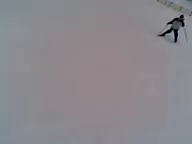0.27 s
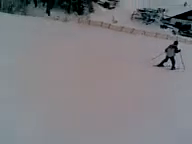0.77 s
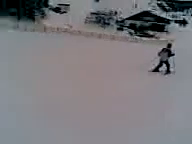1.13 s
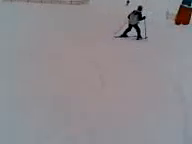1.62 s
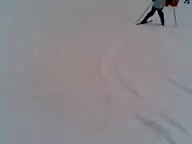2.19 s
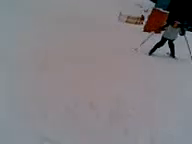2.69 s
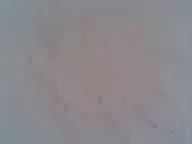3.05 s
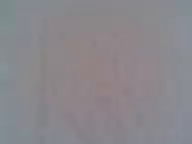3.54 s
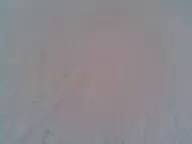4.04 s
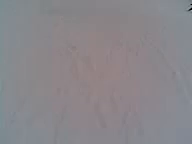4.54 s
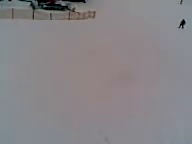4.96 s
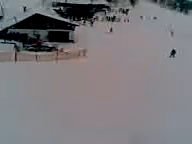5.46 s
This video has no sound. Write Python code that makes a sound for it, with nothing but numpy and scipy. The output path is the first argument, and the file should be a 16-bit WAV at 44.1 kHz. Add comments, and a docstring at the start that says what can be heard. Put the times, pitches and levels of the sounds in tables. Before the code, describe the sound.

On a ski slope, a brief hush breaks into loud, uneven wind buffeting with rough scraping, sharp knocks and clipped crackles.

```python
"""Two faint scuffs in a quiet moment, then wind buffeting a small camera microphone on a ski slope.
Turbulent eddies rumble and slap on the membrane: noise with a falling spectrum, and short ringing puffs.
Skis and cloth scrape and knock: friction noise through the casing's resonances, and damped bursts.
The cheap recorder limits peaks and passes a narrow band with hiss; the sharpest crests clip."""
import sys
import numpy as np
from scipy import signal
from scipy.io import wavfile
from scipy.ndimage import uniform_filter1d, minimum_filter1d

SR = 44100
rng = np.random.default_rng(int(sys.argv[2]) if len(sys.argv) > 2 else 0)


def generate_wav(sig):
    """Save sig (samples, or channels by samples) to the path in sys.argv[1] as 16-bit PCM at SR."""
    pcm = np.round(np.clip(np.atleast_2d(sig).T, -1, 1) * 32767).astype(np.int16)
    wavfile.write(sys.argv[1], SR, pcm)


N = 252252

# Wind strength; faster air reaches higher: t/s, level/dB, spectral fall over the first kHz/dB
WIND_CURVE = [(0, -51, 9), (.52, -53, -1), (.6, -33, 14), (.74, -14.5, 35), (.83, -30.5, 15),
              (.95, -42, 30), (1.0, -28.5, 12), (1.15, -23.5, 48), (1.34, -31, 54), (1.5, -28.5, 11.5),
              (1.62, -22, 7), (1.69, -31.5, 31), (1.8, -25, 32.5), (1.84, -18.5, 37), (2.15, -14.5, 28),
              (2.24, -11, 29.5), (2.31, -21, 29), (2.42, -20, 30.5), (2.5, -15.5, 39), (2.62, -20.5, 8.5),
              (2.79, -23, 31.5), (3.03, -31.5, 37.5), (3.08, -40.5, 30.5), (3.2, -25.5, 31),
              (3.47, -30.5, 49), (3.62, -36, 41), (3.77, -31, 50), (3.84, -21, 21.5), (4.18, -17.5, 31.5),
              (4.25, -21, 27.5), (4.33, -15.5, 36.5), (4.4, -22, 28), (4.45, -14, 20.5),
              (4.48, -17.5, 27.5), (4.54, -15.5, 18), (4.575, -22, 22), (4.6, -10.5, 26.5),
              (4.69, -15, 14.5), (4.74, -23, 37), (4.79, -11, 21), (4.86, -20, 22.5), (4.94, -16.5, 19),
              (5.08, -21, 21), (5.28, -16, 17), (5.5, -19, 25.5), (5.57, -23.5, 23.5), (5.72, -18, 21)]
# Buffeting spectrum before the fall is applied: f/Hz, density level/dB
BUFFET_SPECTRUM = [(20, -44), (50, -34.5), (100, -4.5), (170, -1), (260, 1.5), (400, -0.5)]
# Extra bass from large eddies, before its dependence on wind: t/s, level/dB
EDDY_BASS = [(0, 4.5), (.5, -7.5), (.75, -9.5), (1.2, -2), (1.55, -2.5), (1.9, 1.5), (2.25, -5),
             (2.5, -1.5), (2.7, -6.5), (3.1, -2), (3.7, -1.5), (4.1, -3), (4.5, -0.5), (4.7, -12.5),
             (4.85, -6.5), (5.0, -2), (5.72, -4.5)]
# Single eddies slapping the membrane: t/s, peak level/dB, centre f/Hz
EDDY_SLAPS = [(.59, -7.5, 377), (.677, -8, 885), (.871, -19.5, 332), (1.106, -29, 305), (1.359, -19.5, 190),
              (1.822, -12.5, 235), (1.908, -13, 172), (2.165, -29, 397), (2.279, -3.5, 471),
              (2.745, -23.5, 250), (3.173, -21, 191), (3.308, -27, 295), (3.682, -18, 219),
              (3.791, -15, 201), (3.827, -11, 260), (4.178, -5, 504), (4.289, -8, 295), (4.363, -12.5, 418),
              (4.389, -8, 270), (4.417, -6.5, 430), (4.489, -7.5, 341), (4.543, -8, 470), (4.598, 0.5, 430),
              (4.645, -5, 680), (4.762, -14, 425), (4.9, -23, 520), (4.982, -11.5, 330),
              (5.045, -11.5, 590), (5.103, -11, 534), (5.371, -18.5, 633), (5.402, -9.5, 467),
              (5.515, -19, 430), (5.638, -13.5, 153)]
# Scraping of skis and cloth: t/s, level/dB, gain of the casing's body/dB
SCRAPE_CURVE = [(0, -65.5, 11), (.06, -48.5, -1), (.16, -46.5, 1.5), (.51, -57, 4.5), (.555, -28.5, 6),
                (.61, -18.5, 7), (.65, -22.5, 0), (.77, -20, 11), (.81, -28.5, 0.5), (.95, -39.5, 6.5),
                (1.025, -31, -1), (1.05, -22, 10), (1.1, -34, -5), (1.3, -39, -0.5), (1.38, -42.5, 4),
                (1.48, -26.5, -4.5), (1.6, -27.5, -1), (1.695, -33, 8), (1.712, -29, 6.5), (1.8, -28.5, 3),
                (1.92, -31.5, -2.5), (2.01, -25, 6.5), (2.1, -25.5, 3.5), (2.17, -28, 0),
                (2.47, -36.5, 4.5), (2.59, -17, 2.5), (2.67, -19.5, 0.5), (2.71, -24.5, 8), (2.75, -36, 1),
                (3.04, -37, 0), (3.15, -36, 0.5), (3.45, -37.5, 1.5), (3.5, -34.5, -8.5),
                (3.79, -31.5, -1.5), (4.1, -33.5, -14), (4.3, -36.5, -17), (4.37, -48, -9.5),
                (4.58, -57, -1), (4.6, -30, -11.5), (4.68, -44.5, 2), (4.73, -55.5, -7), (4.85, -53.5, 2),
                (4.98, -37, -5), (5.06, -57, 13), (5.15, -26.5, 2.5), (5.33, -34.5, -6), (5.57, -43, 4),
                (5.72, -41.5, -1)]
# Resonances of the casing: f/Hz, density level/dB
CASING_SPECTRUM = [(30, -60), (150, -17), (350, -22), (700, -5.5), (1250, 1.5), (1500, -4.5), (2000, -2.5),
                   (2500, -3.5), (2800, -10), (3100, -9), (3620, -1.5), (3900, -15.5), (4300, -23),
                   (4500, -33)]
# Gain of the top resonance, before its dependence on scraping: t/s, level/dB
TOP_GAIN = [(0, -7.5), (.5, -6.5), (.9, -2), (1.1, -4), (1.3, 2.5), (1.6, -3), (2.2, -2.5), (2.45, -5.5),
            (2.65, -2), (2.8, -2.5), (3.4, -7.5), (3.7, -1.5), (4.15, 0.5), (4.3, -6.5), (4.4, -2.5),
            (4.55, -9.5), (4.8, -7.5), (4.89, -4), (5.0, -12.5), (5.15, -2), (5.72, -6.5)]
# Short scuffs and knocks: t/s, peak level/dB, centre f/Hz, T60/s,
# breadth (ratio either side of the centre; a floor applies)
SCUFF_EVENTS = [(.057, -23.5, 2320, 0.059, 1.15), (.06, -32, 713, .29, 1.19),
                (.069, -22.5, 2400, .15, 1.11), (.1, -28, 2420, 0.21, 1.08), (.216, -21.5, 870, 0.11, 1.64),
                (.22, -25.5, 713, 0.22, 1.16), (.547, -11.5, 1550, 0.27, 1.2),
                (.716, -14, 1230, 0.055, 1.9), (.779, -14, 1100, 0.093, 1.8), (.872, -11.5, 1260, .03, 2),
                (.904, -14.5, 1530, 0.018, 1.8), (1.037, -3, 1310, .05, 2.2),
                (1.055, -10.5, 1170, 0.059, 2), (1.609, -8.5, 1500, 0.1, 1.7), (1.705, -5, 760, 0.074, 1.6),
                (1.705, -9, 2140, 0.036, 1.2), (1.887, -11.5, 1500, 0.05, 1.66),
                (1.957, -15.5, 1216, 0.11, 0.98), (2.434, -9.5, 900, .035, 2.4),
                (2.54, -6, 1126, 0.11, 1.37), (2.706, -7, 733, 0.035, 1.09),
                (2.959, -16.5, 2560, 0.06, 1.09), (3.316, -28, 2650, .07, 1.07),
                (3.651, -16.5, 1080, 0.074, 1.17), (3.861, -14.5, 3030, 0.045, 1.26),
                (4.332, -16.5, 886, 0.023, 1.9), (4.446, -11, 804, 0.11, 1.32),
                (4.595, -23, 626, 0.063, 1.35), (4.595, -21.5, 3500, 0.085, 1.08),
                (4.867, -16, 940, 0.027, 1.4), (5.102, -25, 697, 0.022, 2), (5.335, -10, 800, 0.024, 1.83)]
# Sharp crests that escape the limiter: t/s, peak level/dB, width/s (a floor applies)
SURGE_EVENTS = [(.684, -2.5, 0.0003), (0.699, -0.5, 0.00032), (0.74, -1.5, 0.00018), (0.745, -2, 0.000087),
                (.768, -2.5, 0.00036), (1.044, -4, 0.00027), (1.057, 0.8, 0.00017), (2.017, -2, 0.0003),
                (2.025, 1, 0.00024), (2.089, -1, 0.00024), (2.098, -2, 0.00013), (2.183, -1.5, 0.00047),
                (2.239, -3, 0.00031), (2.614, -2, 0.0002), (2.635, -2.5, 0.00021), (2.647, -2.5, 0.00018),
                (2.713, -2, 0.00013), (4.198, -0.5, 0.00049), (4.511, -2, 0.00036), (4.539, -1.5, 0.00057),
                (4.598, -2.5, 0.00052), (4.653, -1.5, 0.00046), (4.684, -2.5, 0.00031)]

FALL_HZ = 300  # the buffeting spectrum falls above this
SPLIT_HZ = 390  # above it the wind comes in sharper spits
BASS_PER_FALL, USUAL_FALL_DB = .2, 25  # dB/dB, dB: slow air has larger eddies and more bass
BASS_PER_DB, GUST_DB = -0.34, -26.5  # dB/dB, dB: more bass in lulls, less in gusts above GUST_DB
SLAP_T60_S, SLAP_BREADTH = 0.081, 1.67  # breadth is a ratio either side of the centre
TOP_PER_DB, FIRM_DB = -0.27, -32.5  # dB/dB, dB: less top as scraping grows past FIRM_DB
LIMIT, LIMITER_S = .64, .004  # crest amplitude held by the limiter, time over which its gain moves
BASS_CUT_HZ, BAND_HZ, EDGE_HZ = 45, 4441, 15800  # high-pass, narrow band limit, final low-pass
FULL_SCALE = 0.704  # amplitude at which the recorder clips
HISS_DB, HISS_S = -43, .01  # hiss relative to the sound, time over which it follows the sound


def wind():
    """Turbulence: large eddies give a lumpy rumble, small ones sharper spits on top."""
    t, hz = grid(size=1024)
    level_db, fall_db = follow(WIND_CURVE, t)
    bass_db = follow(EDDY_BASS, t)[0]
    bass_db += BASS_PER_DB * np.maximum(level_db - GUST_DB, -10)
    bass_db += BASS_PER_FALL * (fall_db - USUAL_FALL_DB)

    khz_above = np.maximum(hz - FALL_HZ, 0) / 1000
    shape_db = read(BUFFET_SPECTRUM, hz) - np.maximum(fall_db, 12) * khz_above ** 1.19
    shape_db += bass_db * ramp(hz, 290, 98)
    air = noise(in_band(shape_db, hz, 80, 450), patch_db=1.5, bins=6, frames=3)

    split = signal.butter(2, SPLIT_HZ, fs=SR, output="sos")
    rumble = signal.sosfiltfilt(split, air)
    spits = flutter(32, 2.3) * flutter(120, 2.8) * (air - rumble)
    lumpy = flutter(53, 0.45) * rumble + spits
    strength = gain_of(follow(WIND_CURVE, np.arange(N) / SR)[0])
    return strength * flutter(14, 0.45) * lumpy


def slaps():
    """Impulsive pressure: each eddy strikes the membrane as a short band of decaying noise."""
    events = [(*row, SLAP_T60_S, SLAP_BREADTH) for row in EDDY_SLAPS]
    return bursts(events, rise_s=0.00065, blow=7.8)


def surged(x):
    """Overload: at a few instants a sharp crest escapes the limiter and swamps other motion."""
    lead_s = .003  # time from the start of each window to its crest
    t = np.arange(2 * round(lead_s * SR)) / SR - lead_s
    push, swamped = np.zeros(N), np.zeros(N)
    ways = rng.choice([-1., 1.], len(SURGE_EVENTS))
    for (s, db, width), way in zip(SURGE_EVENTS, ways):
        u = (t / max(width, .00015)) ** 2
        crest = (1 - u) * np.exp(-u / 2)
        add(push, s - lead_s, way * gain_of(db) * crest)
        add(swamped, s - lead_s, np.exp(-(u / 12) ** 2))
    return x * (1 - np.minimum(swamped, 1)) + push


def scrape():
    """Friction: dense noise in quick uneven grains, coloured by the casing's resonances."""
    t, hz = grid(size=512)
    level_db, body_db = follow(SCRAPE_CURVE, t)
    top_db = follow(TOP_GAIN, t)[0] + TOP_PER_DB * np.maximum(level_db - FIRM_DB, -18)
    shape_db = read(CASING_SPECTRUM, hz)
    shape_db = shape_db + body_db * ramp(hz, 1400, 1100) + top_db * ramp(hz, 2420, 3000)
    rush = noise(in_band(shape_db, hz, 1600, 2800), patch_db=2.3, bins=6, frames=8)
    strength = gain_of(follow(SCRAPE_CURVE, np.arange(N) / SR)[0])
    return strength * flutter(27, 1.87) * flutter(220, 1.7) * rush


def scuffs():
    """Contact excitation: brief rubs and knocks start abruptly and die away exponentially."""
    return bursts(SCUFF_EVENTS, rise_s=0.000063, blow=9.6)


def hiss(x):
    """Quantisation: coarse sampling steps give white noise that follows the signal's level."""
    loudness = np.sqrt(abs(uniform_filter1d(x ** 2, round(HISS_S * SR))))
    return gain_of(HISS_DB) * loudness * rng.standard_normal(N)


def bursts(events, rise_s, blow):
    """Damped excitation: each event is a fast-rising puff of noise, band-passed round its centre."""
    out, t = np.zeros(N), np.arange(8000) / SR
    puffs = rng.standard_normal((len(events), len(t)))
    for (s, db, hz, t60, breadth), puff in zip(events, puffs):
        breadth = max(breadth, 1.06)
        edges = [hz / breadth, min(hz * breadth, 4400)]
        decay = gain_of(-60 * t / max(t60, .01))
        puff = puff * (1 - np.exp(-t / rise_s)) * decay
        puff[0] = blow * np.sign(puff[1])  # the first contact is one sharp blow
        band = signal.butter(4, edges, "band", fs=SR, output="sos")
        sound = signal.sosfilt(band, puff)
        add(out, s, gain_of(db) * sound / abs(sound).max())
    return out


def noise(field_db, patch_db, bins, frames):
    """Spectral synthesis: random spectra at given levels, broken into patches of uneven strength."""
    real, imag, patches = rng.standard_normal((field_db.shape[1], len(field_db), 3)).T
    patches = uniform_filter1d(patches, bins, 0)
    patches = evened(uniform_filter1d(patches, frames, 1))
    mean_gain = gain_of(patch_db ** 2 * np.log(10) / 20)  # rms gain of the patches
    spectra = (real + 1j * imag) * gain_of(field_db + patch_db * patches) / mean_gain
    size = 2 * len(real) - 2
    return signal.istft(spectra, nperseg=size, noverlap=3 * size // 4)[1][:N]


def flutter(per_s, depth_db):
    """Amplitude modulation: random quick level changes that keep the mean power."""
    lumps = uniform_filter1d(rng.standard_normal(N), round(SR / per_s))
    lumps = uniform_filter1d(lumps, round(SR / per_s / 2))
    return evened(gain_of(depth_db * evened(lumps)))


def in_band(shape_db, hz, lo, hi):
    """Power normalisation: shifts spectra so that lo-hi has unit power once the frames overlap."""
    power = (gain_of(shape_db) ** 2 * ((hz > lo) & (hz < hi))).sum(0)
    return shape_db - 10 * np.log10(power / 1.5)


def grid(size):
    """Short-time analysis: frame times/s and bin frequencies/Hz, with frames a quarter size apart."""
    return np.arange(4 * N // size + 5) * size / 4 / SR, np.fft.rfftfreq(size, 1 / SR)[:, None]


def read(points, hz):
    """Logarithmic pitch scale: a spectrum's level/dB, interpolated over log frequency."""
    f, value = np.transpose(points)
    return np.interp(np.log(hz + 1), np.log(f + 1), value)


def follow(curve, t):
    """Linear interpolation: the columns of a curve at the times t/s."""
    s, *columns = np.transpose(curve)
    return [np.interp(t, s, c) for c in columns]


def ramp(hz, from_hz, to_hz):
    """Linear weighting: 0 at from_hz, 1 at to_hz and beyond."""
    return np.clip((hz - from_hz) / (to_hz - from_hz), 0, 1)


def gain_of(db):
    """Decibel law: the amplitude ratio of a level."""
    return 10 ** (np.asarray(db) / 20)


def evened(x):
    """Power normalisation: scales x to an rms of one."""
    return x / np.sqrt(np.mean(x ** 2) + 1e-20)


def add(mix, s, sound):
    """Superposition: sums a sound into the mix from time s/s."""
    part = mix[round(s * SR):][:len(sound)]
    part += sound[:len(part)]


def lowpass(x, hz, size):
    """Band limitation: a linear-phase filter, without delay, removes what lies above hz."""
    taps = signal.firwin(size, hz, window=("kaiser", 11), fs=SR)
    return signal.oaconvolve(x, taps[None], "same")


def limited(x):
    """Peak limiting: the gain dips smoothly round every crest above the limit."""
    size = round(LIMITER_S * SR)
    gain = minimum_filter1d(LIMIT / np.maximum(abs(x), LIMIT), size)
    gain = uniform_filter1d(gain, size // 2)
    return x * uniform_filter1d(gain, size // 2)


def scene():
    """Superposition: the pressures of wind, slaps, scraping and scuffs add."""
    return (wind() + slaps() + scrape() + scuffs())[None]


def record(dry):
    """Recorder chain: limiting, bass cut, hiss and a narrow band; escaped crests then clip and crackle."""
    held = surged(limited(lowpass(dry, BAND_HZ, size=601)))
    bass_cut = signal.butter(3, BASS_CUT_HZ, "high", fs=SR, output="sos")
    thin = signal.sosfilt(bass_cut, held)
    narrow = lowpass(thin + hiss(thin), BAND_HZ, size=601)
    clipped = np.clip(narrow, -FULL_SCALE, FULL_SCALE)
    return lowpass(clipped, EDGE_HZ, size=201)


dry = scene()
out = record(dry)
generate_wav(out)
```